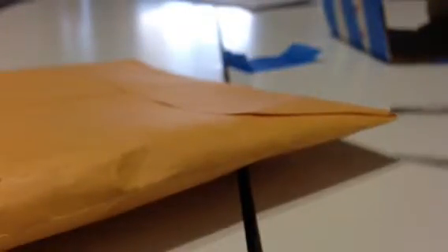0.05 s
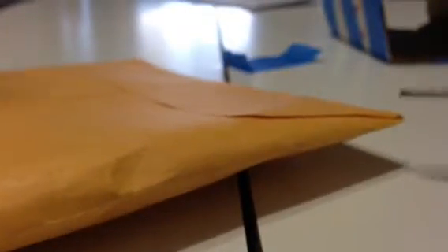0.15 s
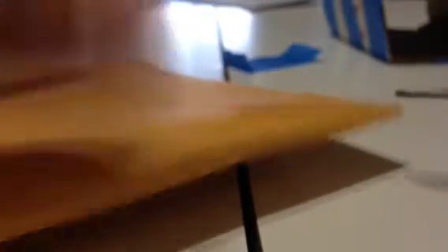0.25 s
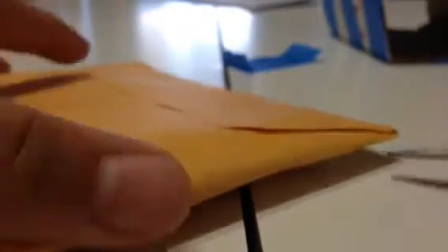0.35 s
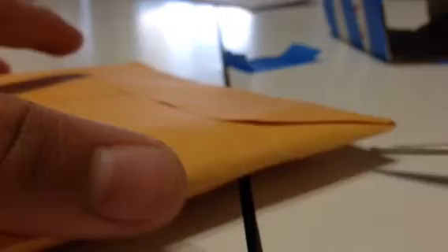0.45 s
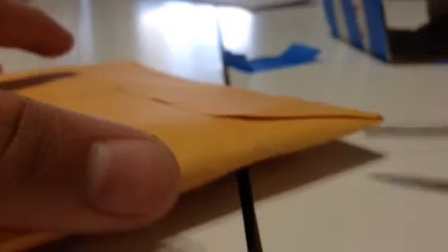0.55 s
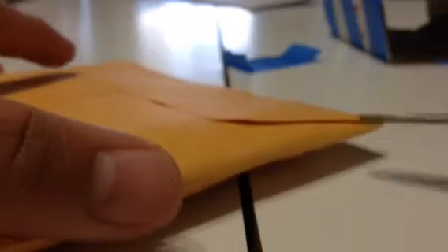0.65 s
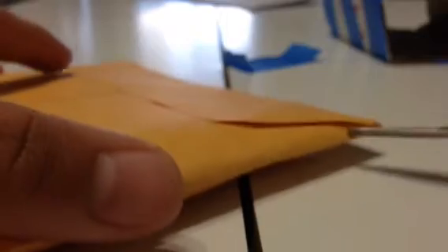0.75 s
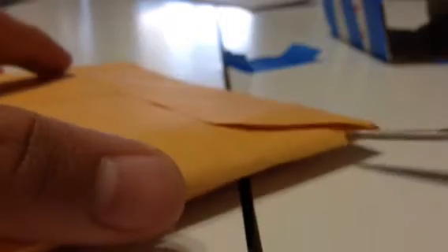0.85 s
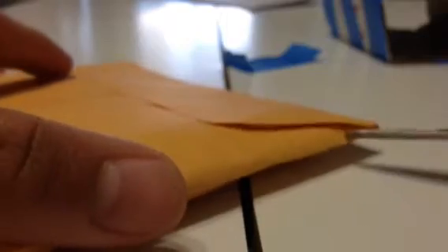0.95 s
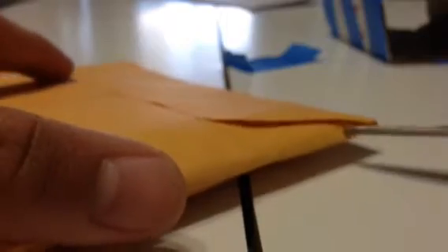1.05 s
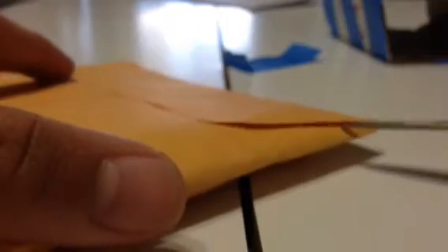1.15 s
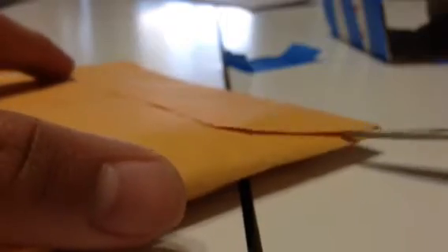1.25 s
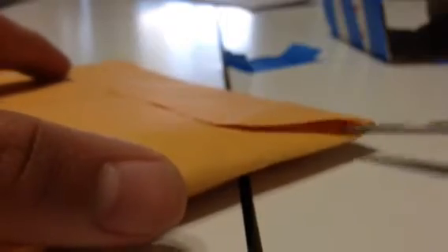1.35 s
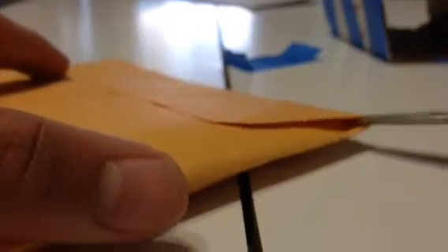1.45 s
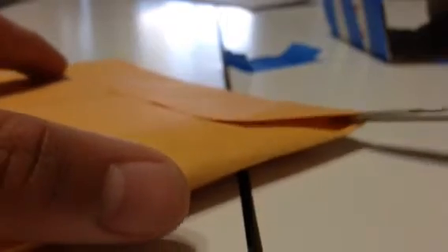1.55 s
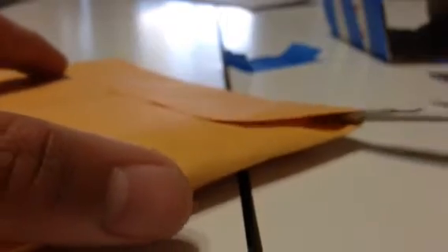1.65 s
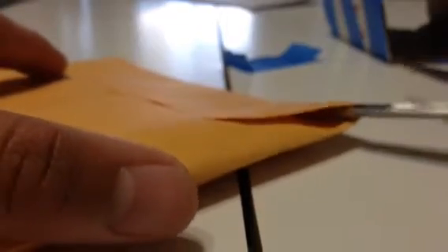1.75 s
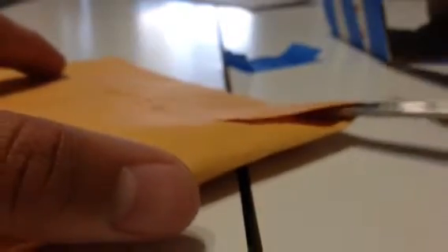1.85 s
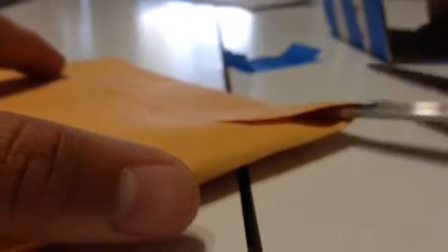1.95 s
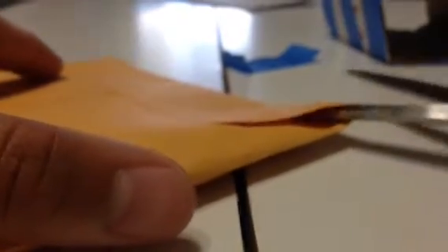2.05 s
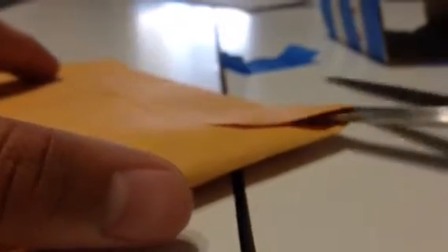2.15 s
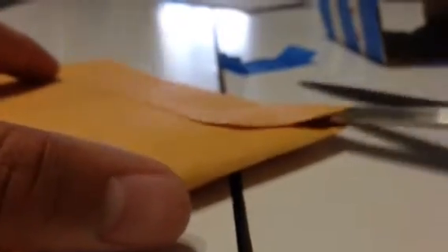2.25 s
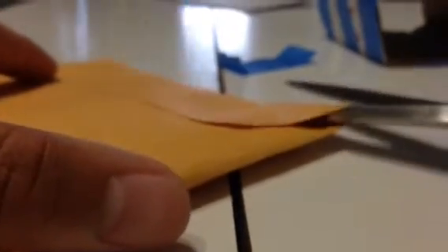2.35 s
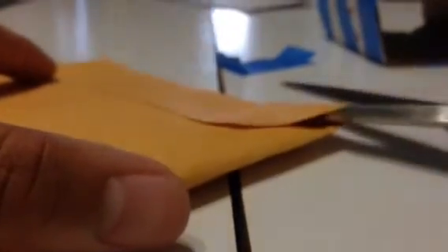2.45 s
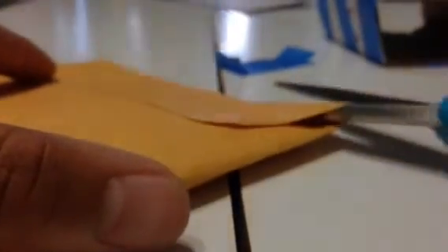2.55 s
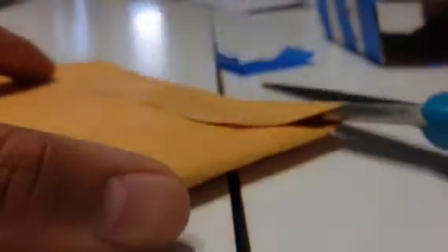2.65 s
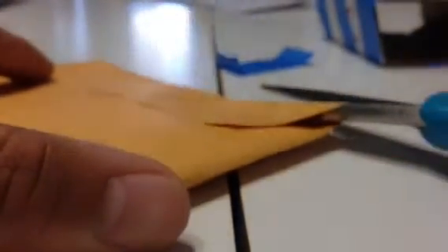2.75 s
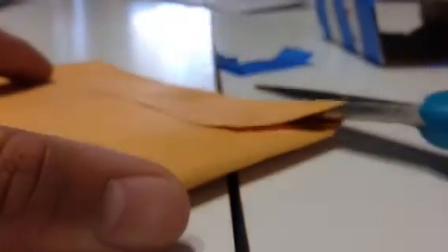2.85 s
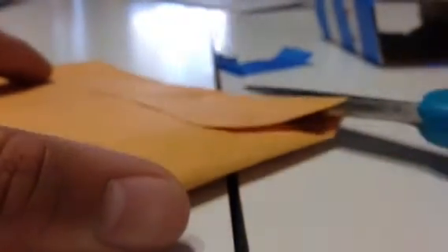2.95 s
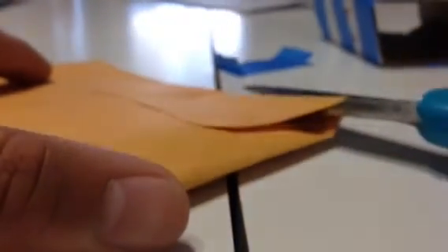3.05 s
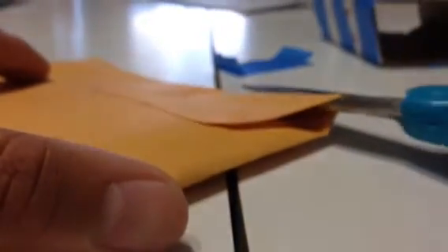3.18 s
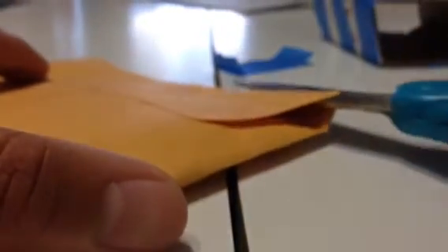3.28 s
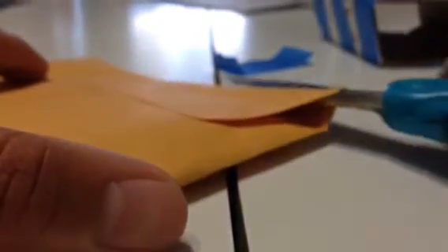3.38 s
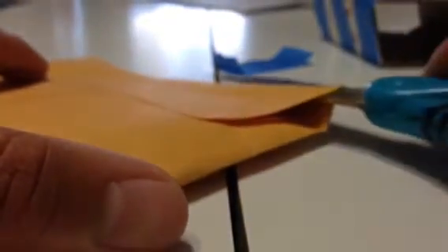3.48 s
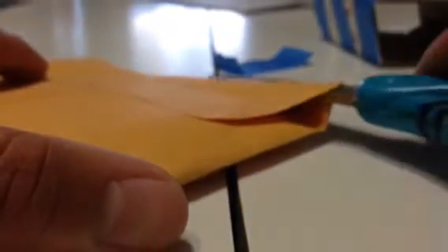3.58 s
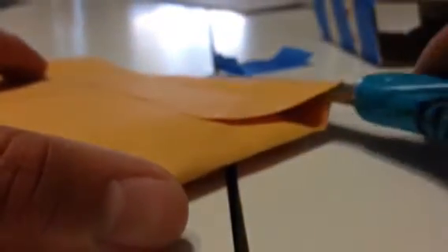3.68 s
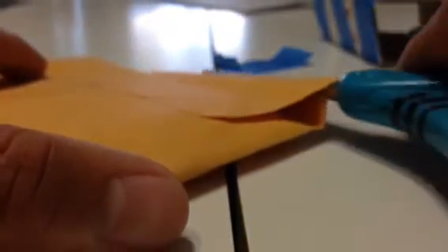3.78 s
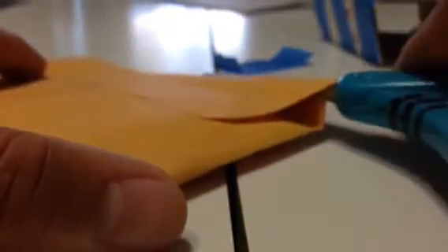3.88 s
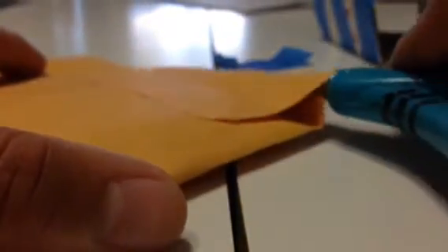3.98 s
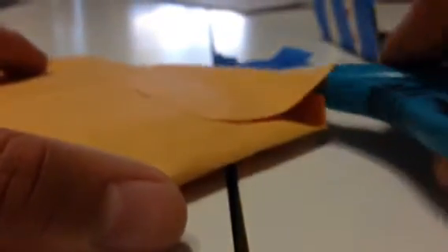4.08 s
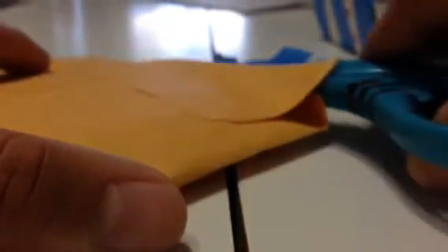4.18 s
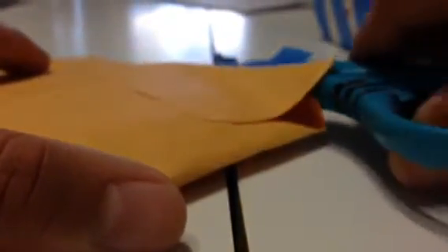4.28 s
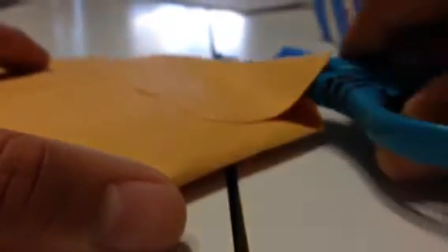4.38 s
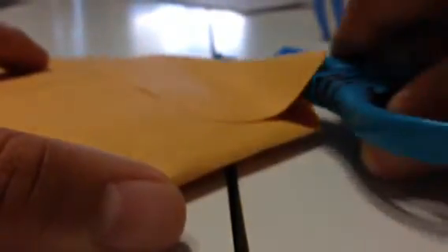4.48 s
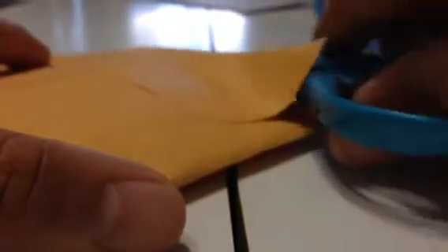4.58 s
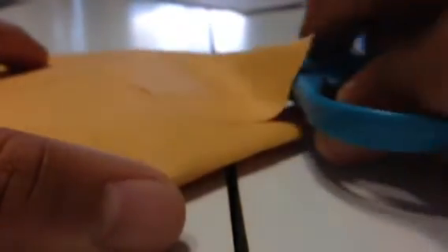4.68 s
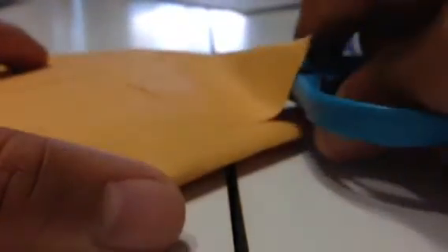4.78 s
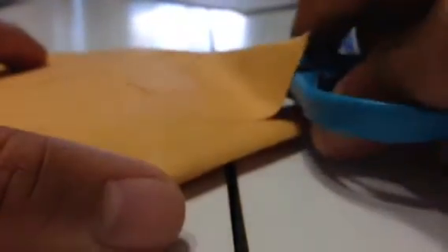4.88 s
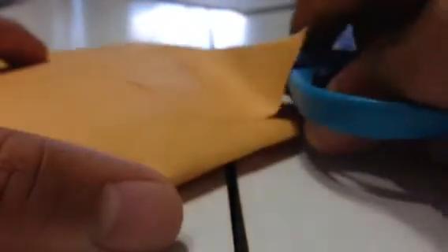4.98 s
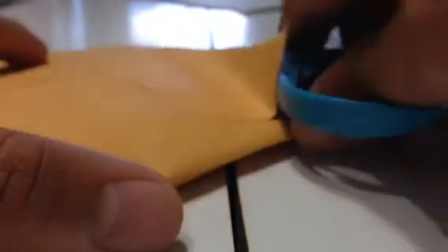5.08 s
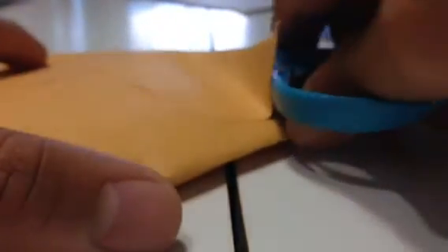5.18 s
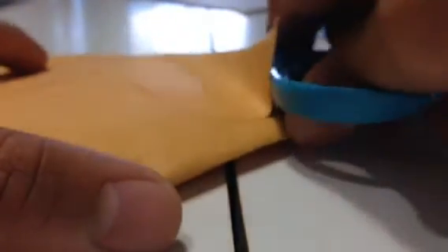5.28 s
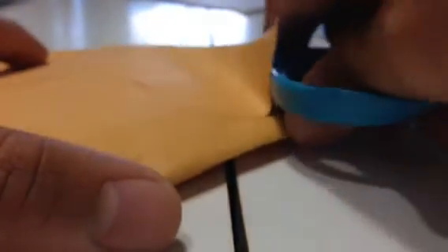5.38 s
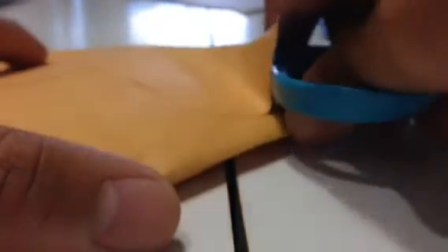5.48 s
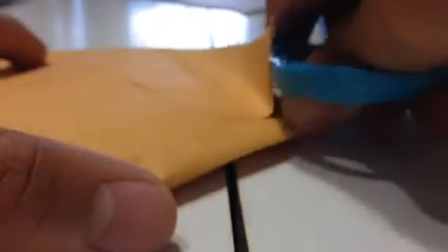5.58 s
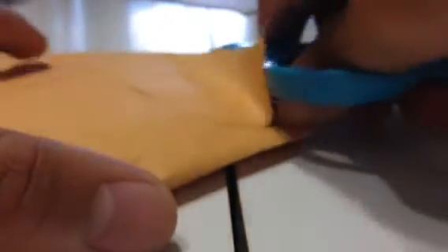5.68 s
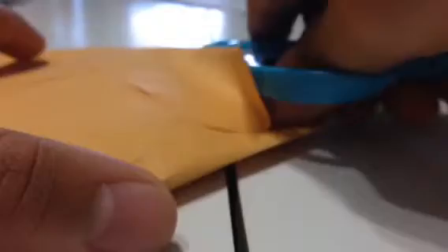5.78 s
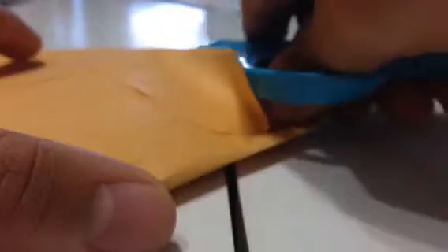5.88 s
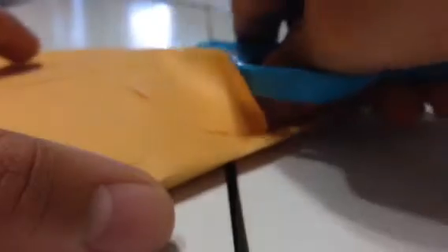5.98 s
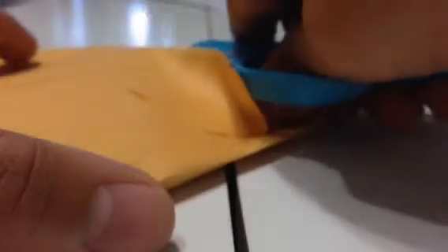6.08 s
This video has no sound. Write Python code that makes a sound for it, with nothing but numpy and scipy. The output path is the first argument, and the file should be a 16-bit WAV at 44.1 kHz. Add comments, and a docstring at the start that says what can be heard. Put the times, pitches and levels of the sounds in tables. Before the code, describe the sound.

Dry, close and mono: fingers knock and scuff a paper envelope, creases click, and a scissor blade glides smoothly into the fold. Then it catches, giving juddering rasps, brief fibrous tears and bright snaps, growing denser and louder through the second half. Dull taps and soft low thuds against the table punctuate it. Behind lies quiet room air with a weak steady hum.

```python
"""Dry hiss of a scissor blade sliding into a stiff envelope, then short rasps as it catches and tears the fold.
The envelope lies on a table, close to the microphone; the taut paper snaps and clicks, the blade taps dully and
once ticks with a ring. The hand bumps the envelope softly against the table; the room is quiet, with a weak
hum. Sliding and tearing are noisy forces filtered by air pocket, sheet and fibres; snaps, ticks and taps are
struck damped modes; bumps are decaying low sines with scuff noise."""
import sys
import numpy as np
from scipy import signal
from scipy.fft import rfft, irfft, next_fast_len
from scipy.io import wavfile
from scipy.ndimage import uniform_filter1d, map_coordinates

SR = 44100
rng = np.random.default_rng(int(sys.argv[2]) if len(sys.argv) > 2 else 0)


def log_audio(samples):
    """Write samples as a 16-bit WAV file to the path given in sys.argv[1]."""
    # one column per channel
    frames = np.atleast_2d(samples).T
    # limit to full scale, then quantise
    limited = np.clip(frames, -1, 1)
    pcm = np.round(limited * 32767).astype(np.int16)
    wavfile.write(sys.argv[1], SR, pcm)


N = 270333  # samples

# touch = (hollow/dB re sheet, fibre hiss/dB re sheet, air pocket f/Hz, favoured bending mode f/Hz)

# blade and fingers slide on the paper:
# (full grip t/s, rise/s, hold/s, release/s, sheet level/dB, change over hold/dB, *touch)
STROKES = [(0.344, .01, 0.014, 0.077, -50.5, 1.5, 3, -10.5, 850, 2020),
           (.405, 0.024, 0.02, 0.033, -39.5, 0, 6.5, -17, 890, 1930),
           (0.564, .08, .04, .08, -61, 0.5, -2.5, -17, 840, 2510),
           (.87, .1, 0.29, 0.12, -67.5, -12, -3, -3, 845, 2480),
           (1.195, 0.042, 0.013, 0.028, -37, -6.5, -0.5, -15, 770, 4530),
           (1.398, 0.055, 0.096, .04, -57, 18.5, -2.5, -5.5, 990, 2880),
           (1.912, 0.099, 0.33, 0.3, -62.5, 9, 7, -15, 690, 2520),
           (2.276, 0.091, 0.094, 0.079, -40.5, -8.5, -5, -8, 820, 2700),
           (2.602, 0.08, 0.06, 0.092, -45, -3, 0, -12, 930, 2480),
           (2.923, 0.19, .06, 0.066, -49.5, -8, 0, -9.5, 990, 2550),
           (3.198, 0.042, 0.012, 0.087, -40.5, 5, 1, -7.5, 425, 4300),
           (3.323, 0.019, 0.04, 0.13, -39.5, -0.5, -1, -8.5, 804, 1870),
           (3.665, 0.039, 0.041, 0.044, -43.5, -5, 1.5, -10, 900, 2570),
           (3.783, 0.035, 0.0079, 0.05, -34, 0.5, 1, -13, 800, 5000),
           (4.081, .02, 0.071, 0.14, -36, -2, 0.5, -8, 795, 4760),
           (4.216, 0.11, 0.34, 0.061, -52, 6, 2, -15, 774, 3560),
           (4.597, .07, 0.1, 0.078, -31.5, -7, -3, -15.5, 730, 2540),
           (4.959, .04, 0.025, 0.039, -58, -12, 4, -1, 1100, 2400),
           (5.036, 0.014, .01, 0.11, -34.5, -5, -2.5, -6.5, 1150, 2280),
           (5.093, 0.22, 0.091, 0.19, -50, 1, -3, -13, 1150, 5140),
           (5.318, 0.025, 0.013, 0.092, -48.5, 7.5, 6.5, -8, 800, 4850),
           (5.604, 0.025, 0.009, 0.029, -48, 3.5, 4.5, -8, 900, 2200),
           (5.642, 0.0075, 0.015, 0.11, -31.5, -4.5, -5.5, -10, 1210, 2130),
           (5.774, 0.11, 0.087, 0.11, -44.5, -1, -2.5, -11, 1300, 1710)]
STROKE_FADE_DB = 24  # fall per rise or release time


def sliding():
    """Each stroke of steel or skin takes grip, holds and lets go."""
    out = np.zeros(N)
    t_s = np.arange(N) / SR
    drag = friction(slow_db=2.95, fast_db=2.65)
    for start_s, rise_s, hold_s, release_s, level_db, change_db, *touch in STROKES:
        # twice the rise and release: fades reach 2 * STROKE_FADE_DB
        span = (t_s >= start_s - 2 * rise_s) & (t_s < start_s + hold_s + 2 * release_s)
        u_s = t_s[span] - start_s
        fade = np.maximum(-u_s / rise_s, 0) + np.maximum((u_s - hold_s) / release_s, 0)
        grip_db = level_db + change_db * np.clip(u_s / hold_s, 0, 1) - STROKE_FADE_DB * fade
        force = drag[span] * amp(grip_db)
        add(out, t_s[span][0], envelope(force, start_s, *touch))
    return out


# flat of the blade glides in under the flap: (t/s, level/dB, hiss/dB re level, before hiss_offset_db)
GLIDE = [(1.55, -64, -13), (1.595, -53.5, -13), (1.645, -38.5, -4.5), (1.715, -35.5, -7.5),
         (1.81, -39, -23), (1.87, -47.5, -23), (1.92, -65, -25)]
# paper under the flat blade, before normalisation: (f/Hz, level/dB)
GLIDE_COLOUR = [(120, -42), (200, -17), (322, -17), (461, -8.5), (717, -7.5), (1040, -2), (1570, -4.5),
                (2220, -7), (2450, 0), (4000, -9), (6020, -5.5), (10000, -26), (13000, -62), (22000, -120)]


def gliding(hiss_offset_db=-4.0):
    """The flat of the blade slides in with a smooth, dry hiss."""
    knots_s, *columns = np.transpose(GLIDE)
    t_s = np.arange(N) / SR
    level_db, hiss_db = [np.interp(t_s, knots_s, c, left=-120, right=-120) for c in columns]
    force = amp(level_db) * friction(slow_db=1.1, fast_db=0.3)
    hiss = coloured(force * amp(hiss_db + hiss_offset_db), FIBRES)
    return coloured(force, GLIDE_COLOUR) + hiss


# unbroken rips of the fold: (t/s, length/s, sheet level/dB, swell over rip/dB, *touch)
RIPS = [(3.469, 0.083, -34.5, -1, 0.33, -3, 920, 2550), (3.555, 0.098, -30, 4, 0.47, -8, 980, 1940),
        (3.993, 0.059, -27.5, 3, 0, -4, 780, 4340), (4.056, 0.0215, -30, -8, 0.23, -6, 776, 4850),
        (4.791, .027, -28.5, 10, 0.58, -7, 720, 4250)]
# single catches of the blade: (t/s, length/s, sheet level/dB, *touch)
RASPS = [(1.189, 0.018, -28, -7, -18, 780, 4500), (3.454, 0.0089, -39.5, 2.5, -2, 940, 2600),
         (3.678, 0.0046, -25.5, 2.5, -8, 925, 2670), (3.896, 0.0079, -41, 6.5, -11, 900, 6200),
         (3.96, 0.013, -42, 3, -8, 800, 4300), (3.978, 0.012, -29, -1.5, -4, 800, 4330),
         (4.753, 0.0062, -42, 10, -11.5, 720, 2470), (4.769, 0.008, -27.5, -3.5, -8.5, 710, 4300),
         (4.148, 0.014, -45.5, 7.5, -3, 790, 4940), (5.976, 0.014, -47.5, 5, -15, 1120, 1650),
         (6.025, 0.011, -38.5, 7.5, -8, 780, 1650)]
# even stick-slip: (t/s, slips, period/s, slip length/s, first level/dB, change per slip/dB, *touch)
JUDDERS = [(1.455, 2, 0.032, .016, -24.5, -1, -9, -11.5, 990, 3000),
           (2.931, 6, 0.02, 0.0079, -33.5, -2.5, -2, -9.5, 995, 6350),
           (4.282, 4, .0235, .016, -39.5, 0.34, 3, -6, 1030, 3780),
           (4.382, 3, 0.0232, 0.01, -25.5, 0.5, 2, -3.5, 790, 3970),
           (4.456, 4, 0.021, 0.01, -36, -1, 5, -7.5, 784, 2500),
           (5.322, 3, 0.0238, .014, -33.5, -.5, -1.5, -9.5, 820, 5240),
           (6.042, 3, 0.015, 0.014, -30, -2.5, -3, -8, 1150, 1730)]


def tearing(edge_s=0.0016, snag_db=3.0, snag_rate_hz=190, slip_sag_db=-3):
    """Each catch of the blade lets go in a burst of breaking fibres; long rips snag unevenly on the way."""
    breaks = fibre_breaks(rate_hz=1500, spread_db=1.0, rub_db=-5.5) * amp(0.62 * wobble(460))
    snagging = breaks * amp(snag_db * np.minimum(wobble(snag_rate_hz), 1))
    out = np.zeros(N)

    def burst(grain, start_s, length_s, level_db, swell_db, *touch):
        count = int((length_s + 2 * edge_s) * SR)
        window = signal.windows.tukey(count, min(4 * edge_s * SR / count, 1))
        tension = window * amp(swell_db * np.linspace(0, 1, count))
        force = unit(grain[int(start_s * SR):][:count] * tension)
        force = force * np.sqrt(length_s * SR / count)  # level refers to length_s, without the edges
        add(out, start_s - edge_s, envelope(amp(level_db) * force, start_s, *touch))

    for rip in RIPS:
        burst(snagging, *rip)
    for start_s, length_s, level_db, *touch in RASPS:
        burst(breaks, start_s, length_s, level_db, slip_sag_db, *touch)
    for start_s, slips, period_s, length_s, level_db, step_db, *touch in JUDDERS:
        for k in range(round(slips)):
            burst(breaks, start_s + k * period_s, length_s, level_db + k * step_db, slip_sag_db, *touch)
    return out


# lift of the low body, greatest just before the fold gives way: (t/s, level/dB)
BODY = [(.4, -6), (1.5, 7), (2.3, -8), (3.15, -0.5), (3.47, 13), (3.6, -4.5), (4, -4), (4.4, -8.5),
        (4.9, -2), (5.6, 7.5), (6.1, 4.5)]
# colours of air pocket, sheet and fibres, before modes and normalisation: (f/Hz, level/dB)
HOLLOW = [(30, -32.5), (80, -13), (180, -1.5), (450, -5.5), (650, -1.5), (1080, -0.5), (1400, -7.5),
          (1900, -9.5), (4000, -69.5)]
SHEET = [(500, -21), (1100, -23.5), (1500, -7.5), (2500, 5.5), (3000, -1), (4050, 5), (5300, 2), (6300, 3),
         (7200, -7), (9000, -16.5), (16000, -50.5)]
FIBRES = [(3000, -42), (6000, -14.5), (7400, -2.5), (9800, 0.5), (14000, -2), (15500, -10)]
# bending modes of the sheet: (f/Hz, lift/dB)
BENDING = [(1560, 8), (2500, 1.5), (4200, 0), (6300, -2)]
BODY_HZ, BODY_Q = 280, 1
POCKET_Q, POCKET_DB = 3.5, 7  # air inside the envelope
SHEET_Q, FAVOURED_DB = 7.7, 7.5  # FAVOURED_DB: lift of the bending mode nearest the touch


def envelope(force, start_s, hollow_db, fibre_db, pocket_hz, favoured_hz):
    """A force on the paper sounds through the air pocket, the stiff sheet and the loose fibres."""
    body_db = np.interp(start_s, *np.transpose(BODY))
    hollow_modes = [(BODY_HZ, BODY_Q, body_db), (pocket_hz, POCKET_Q, POCKET_DB)]
    sheet_modes = [(hz, SHEET_Q, db) for hz, db in BENDING + [(favoured_hz, FAVOURED_DB)]]
    hollow = coloured(force, HOLLOW, hollow_modes)
    sheet = coloured(force, SHEET, sheet_modes)
    fibres = coloured(force, FIBRES)
    return sheet + amp(hollow_db) * hollow + amp(fibre_db) * fibres


def friction(slow_db, fast_db):
    """Drag over the paper's grain with an uneven grip, rms 1."""
    grip = amp(slow_db * wobble(45) + fast_db * wobble(260))
    return unit(grip * fibre_breaks(rate_hz=2000, spread_db=2.5, rub_db=-1.0))


def fibre_breaks(rate_hz, spread_db, rub_db):
    """Tiny impulses of scattered size at random moments, over even rubbing noise."""
    sizes = amp(spread_db * np.clip(rng.standard_normal(N), -2, 2)) * rng.choice([-1, 1], N)
    breaks = unit(sizes * (rng.random(N) < rate_hz / SR))
    return unit(breaks + amp(rub_db) * rng.standard_normal(N))


def flexing(x, depth_db=2.5, order=256, count=3):
    """The contact point wanders: narrow bands of the sheet swell and sink every few hundredths of a second."""
    z = signal.stft(x, nperseg=2 * order)[2]
    field = uniform_filter1d(rng.standard_normal(z.shape), count, 0)  # across bands
    field = uniform_filter1d(field, 2 * count, 1)  # across frames
    gain = unit(amp(depth_db * unit(field)))
    return signal.istft(z * gain)[1][:N]


# taut paper snaps, and at 1.0633 s a ringing tick of the steel blade (high Q); # pocket, lower mode and knock
# levels re upper mode, before contact cut-off: # (t/s, level/dB, Q, air pocket f/Hz, level/dB, lower crease
# mode f/Hz, level/dB, # upper crease mode f/Hz, knock level/dB, contact cut-off f/Hz)
SNAPS = [(.184, -48, 2, 1390, 1, 3440, 2, 6240, -19, 7000),
         (0.383, -36, 3, 820, 8, 2300, 12, 4000, -4, 6000),
         (0.4062, -18, 1.9, 895, 17, 1780, 10, 3580, 16, 6000),
         (0.416, -24, 3, 480, 10, 1860, 8, 3840, -6, 6000),
         (0.8185, -32, 1.46, 1220, 5.5, 2350, 1, 4670, 4, 10000),
         (1.0633, -39, 16, 990, 6.5, 2710, 4, 6400, -18, 8100),
         (1.1736, -31.5, 6.4, 760, 8, 2410, 0, 4430, -18, 6000),
         (1.185, -22.5, 4.8, 785, -1, 2350, -4.5, 4900, -9, 8000),
         (1.3918, -16, 2, 735, 6.5, 2200, 16.5, 4860, 11, 10200),
         (2.6167, -15.5, 4.9, 990, -5, 2540, 1.5, 5570, -17, 8000),
         (3.2038, -21, 18, 484, -12, 1860, -20, 4200, -18, 9000),
         (3.208, -20, 5.7, 470, -7.5, 1790, -9.5, 4430, -26, 9100),
         (3.286, -20.5, 4.5, 800, -2.5, 1940, 3, 4250, -26, 5500),
         (3.2925, -22, 4, 800, -3, 1950, -4, 4250, -25, 5500),
         (3.3145, -22, 4.7, 775, -1, 1850, 2, 4170, -27, 5500),
         (3.801, -27.5, 2.8, 786, 20, 2400, 1, 5100, 10.5, 7000),
         (5.0026, -29, 1.4, 1170, 5.5, 2160, 5.5, 3540, -1, 9000),
         (5.0348, -14.5, 4.5, 900, -4, 2260, -23, 3550, -11.5, 12300),
         (5.748, -11, 2.4, 890, 2, 2350, 1, 4570, -9.5, 6230)]
# blade taps dully through the paper: (t/s, level/dB, f/Hz)
TAPS = [(0.427, -35, 714), (.582, -52, 800), (1.154, -38, 880), (1.297, -44, 1010), (1.3269, -24, 900),
        (2.259, -34, 760), (2.2751, -25.5, 820), (4.6218, -13, 1180), (5.2308, -45, 1040),
        (5.486, -44, 990), (5.792, -29.5, 704)]
TAP_Q, TAP_UPPER_RATIO, TAP_UPPER_DB, TAP_KNOCK_DB, TAP_CUT_HZ = 3.4, 1.45, -6, -14, 5700


def snaps():
    """Bright snaps of a crease over the air pocket, a ringing tick of the steel blade, and dull taps of the
    blade."""
    out = np.zeros(N)
    for (start_s, level_db, q, pocket_hz, pocket_db, lower_hz, lower_db,
         upper_hz, knock_db, cut_hz) in SNAPS:
        modes = [(pocket_hz, pocket_db), (lower_hz, lower_db), (upper_hz, 0)]
        add(out, start_s, amp(level_db) * click(modes, q, knock_db, cut_hz))
    for start_s, level_db, hz in TAPS:
        modes = [(hz, 0), (TAP_UPPER_RATIO * hz, TAP_UPPER_DB)]
        add(out, start_s, amp(level_db) * click(modes, TAP_Q, TAP_KNOCK_DB, TAP_CUT_HZ))
    return out


CLICK_SPAN_S = 0.0029  # time over which a click's level counts as rms


def click(modes, q, knock_db, cut_hz, knock_hz=260, crumple_db=-4,
          crumple_rise_s=0.00067, crumple_t60_s=0.0083, size=2048):
    """A sudden buckle rings a few damped (f/Hz, level/dB) modes and knocks the envelope; soft contacts are dull."""
    t_s, f_hz = np.arange(size) / SR, np.fft.rfftfreq(size, 1 / SR)
    # one sharp push, then the crease settles within a few milliseconds
    settling = amp(-60 * t_s / crumple_t60_s) * (1 - np.exp(-t_s / crumple_rise_s))
    push = rng.standard_normal(size) * settling
    push *= amp(crumple_db) / np.linalg.norm(push)
    push[0] = 1
    body = sum((-1) ** k * amp(db) * resonance(f_hz, hz, q) for k, (hz, db) in enumerate(modes))
    body -= amp(knock_db) * resonance(f_hz, knock_hz, 0.65)
    contact = 1 / (1 + np.sqrt(2) * 1j * f_hz / cut_hz - (f_hz / cut_hz) ** 2)  # 2nd-order low-pass
    dispersion = 1 - 2 * resonance(f_hz, modes[-1][0], 2.0)  # the bending wave spreads into a few swings
    sound = irfft(rfft(push) * body * contact * dispersion)
    return sound / np.linalg.norm(sound) * np.sqrt(CLICK_SPAN_S * SR)


# soft bumps on the table: (t/s, sine level before attack/dB, f/Hz, t60/s)
BUMPS = [(0.155, -33.5, 180, 0.04), (0.349, -35, 111, 0.071), (0.391, -25.5, 80, 0.11),
         (0.404, -20, 151, 0.1), (0.818, -30.5, 152, 0.04), (1.125, -48, 50, 0.22),
         (1.187, -28, 162, 0.073), (1.392, -51, 150, 0.033), (2.29, -39, 76.4, 0.13),
         (4.621, -33, 143, .08), (4.798, -31.5, 169, 0.058), (5.035, -21, 192, 0.028),
         (5.23, -33, 172, 0.028), (5.373, -27.5, 164, 0.045), (5.639, -18, 160, 0.029),
         (5.643, -22.5, 101, 0.045)]


def bumps(attack_s=0.0012, scuff_db=-9):
    """The padded bulk of the envelope gives a short, dull, uneven thud."""
    out, t_s = np.zeros(N), np.arange(SR // 4) / SR
    scuff_colour = [(30, -17), (90, 5.5), (220, -7), (500, -6.0), (1500, -61)]  # (f/Hz, level/dB)
    scuff = coloured(rng.standard_normal(N), scuff_colour)
    for start_s, level_db, hz, t60_s in BUMPS:
        swing = np.sin(2 * np.pi * hz * t_s) + amp(scuff_db) * scuff[int(start_s * SR):][:len(t_s)]
        decay = amp(level_db - 60 * t_s / t60_s)
        add(out, start_s, decay * (1 - np.exp(-t_s / attack_s)) * swing)
    return out


# decay of the room: (f/Hz, t60/s)
ROOM_T60 = [(150, 0.33), (1500, 0.17), (6000, 0.12), (14000, 0.13)]


def room(x):
    """A faint tail from the walls: noise that decays at its own rate in each band, slowest in the bass."""
    hz, t_s, z = signal.stft(rng.standard_normal(SR // 2), SR, nperseg=256)
    decay = amp(-60 * t_s / along(ROOM_T60, hz)[:, None])
    tail = signal.istft(z * decay, SR)[1]
    tail[:SR // 250] = 0  # 4 ms before the first reflection
    return signal.fftconvolve(x, tail / np.linalg.norm(tail))[:N]


# colour of the room air, before normalisation: (f/Hz, level/dB)
ROOM_TONE = [(25, -11.5), (75, 1.5), (129, -5), (220, -7.5), (360, -10.5), (614, -16), (1000, -21.5),
             (15500, -29)]
ROOM_DB = -57.5
HUM_HZ, HUM_DB = 353, -66.5  # HUM_DB: rms


def background():
    """Still room air as coloured noise, with a weak appliance hum: a sine of wavering phase."""
    air = amp(ROOM_DB) * coloured(rng.standard_normal(N), ROOM_TONE)
    phase = 2 * np.pi * HUM_HZ * np.arange(N) / SR + 0.5 * wobble(2.5)
    return air + amp(HUM_DB) * np.sqrt(2) * np.sin(phase)


def amp(db):
    """Decibels to gain."""
    return 10 ** (np.asarray(db) / 20)


def unit(x):
    """Scale to rms 1."""
    return x / np.sqrt(np.mean(x ** 2) + 1e-20)


def along(points, hz):
    """(f/Hz, value) points read on a log axis."""
    f_hz, values = np.transpose(points)
    return np.interp(np.log(hz + 1), np.log(f_hz), values)


def wobble(rate_hz):
    """A smooth random curve, rate_hz knots a second."""
    knots = rng.standard_normal(int(N * rate_hz / SR) + 4)
    return map_coordinates(knots, [np.arange(N) * rate_hz / SR])


def add(track, start_s, sound):
    """Mix a sound into a track from start_s on."""
    part = track[..., max(round(start_s * SR), 0):][..., :sound.shape[-1]]
    part += sound[..., :part.shape[-1]]


def resonance(f_hz, mode_hz, q):
    """Response of one damped mode, 1 at its peak."""
    damping = 1j * f_hz * mode_hz / q
    return damping / (mode_hz * mode_hz - f_hz * f_hz + damping)


def coloured(x, spectrum, modes=(), size=2048):
    """x through a causal filter of unit energy: a broad spectrum lifted by (f/Hz, Q, lift/dB) modes."""
    f_hz = np.fft.rfftfreq(size, 1 / SR)
    # folded cepstrum: minimum phase
    cepstrum = irfft(np.log(amp(along(spectrum, f_hz))))
    cepstrum[1:size // 2] *= 2
    cepstrum[size // 2 + 1:] = 0
    gain = np.exp(rfft(cepstrum))
    for hz, q, db in modes:
        gain = gain * (1 + (amp(db) - 1) * resonance(f_hz, hz, q))
    response = irfft(gain)
    return signal.fftconvolve(x, response / np.linalg.norm(response))[:N]


def scene():
    """All the paper sounds, close by, in a small quiet room."""
    paper = flexing(sliding() + gliding() + tearing()) + snaps() + bumps()
    return (paper + amp(-17.5) * room(paper) + background())[None]


TOP_HZ = 15600
FULL_SCALE = 0.9  # clip level, ahead of the filters


def record(dry, low_cut_hz=35):
    """The microphone clips peaks, sheds the deepest bass and passes nothing above the band limit."""
    size = next_fast_len(N + SR // 2)
    f_hz = np.fft.rfftfreq(size, 1 / SR)
    low_cut = (1j * f_hz / (1j * f_hz + low_cut_hz)) ** 2
    clipped = np.clip(dry, -FULL_SCALE, FULL_SCALE)
    return irfft(rfft(clipped, size) * low_cut * (f_hz < TOP_HZ), size)[..., :N]


dry = scene()
out = record(dry)
log_audio(out)
```